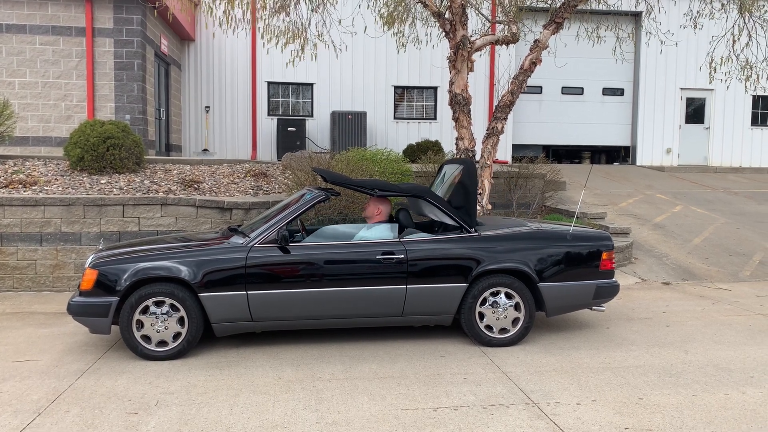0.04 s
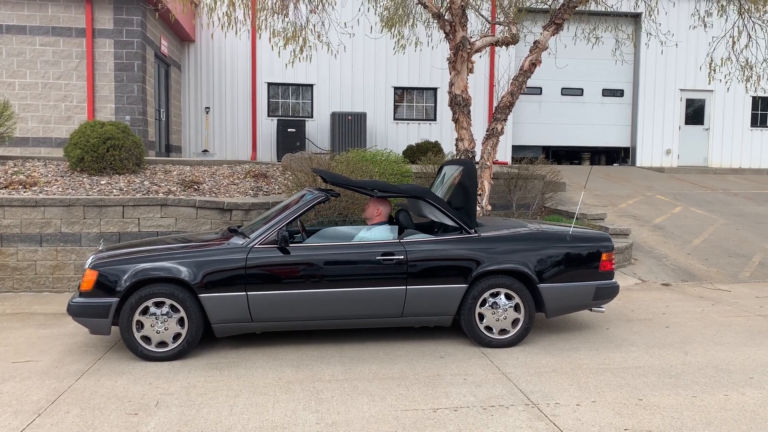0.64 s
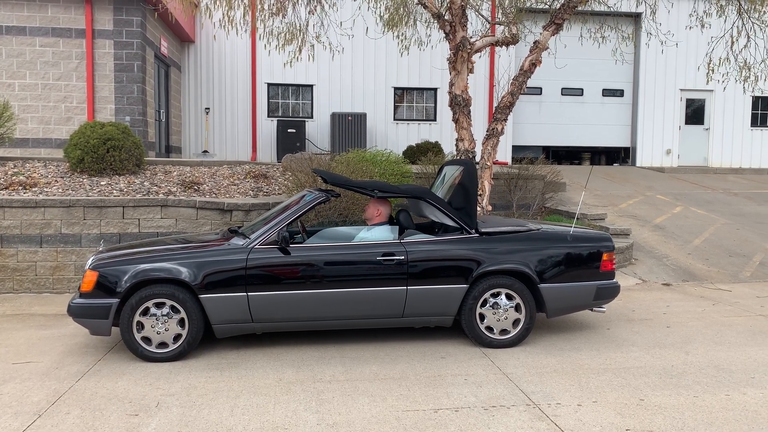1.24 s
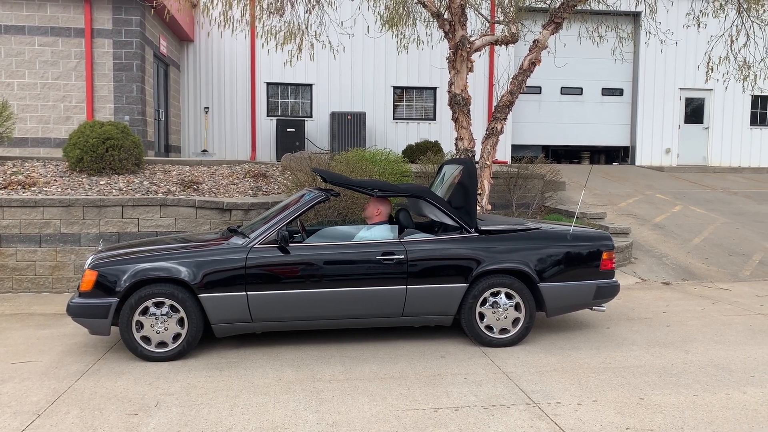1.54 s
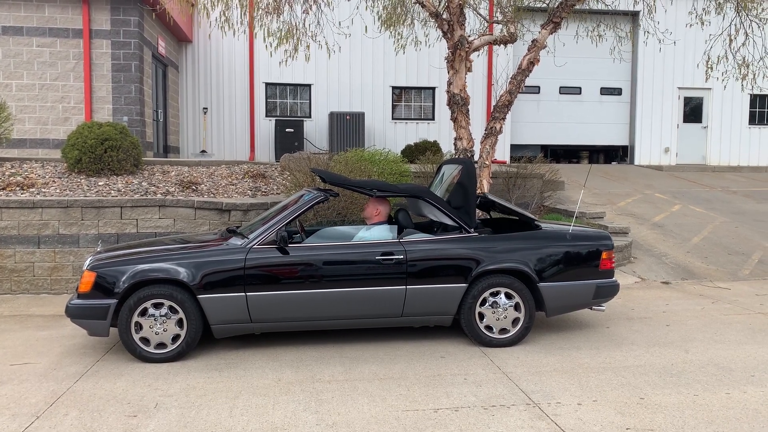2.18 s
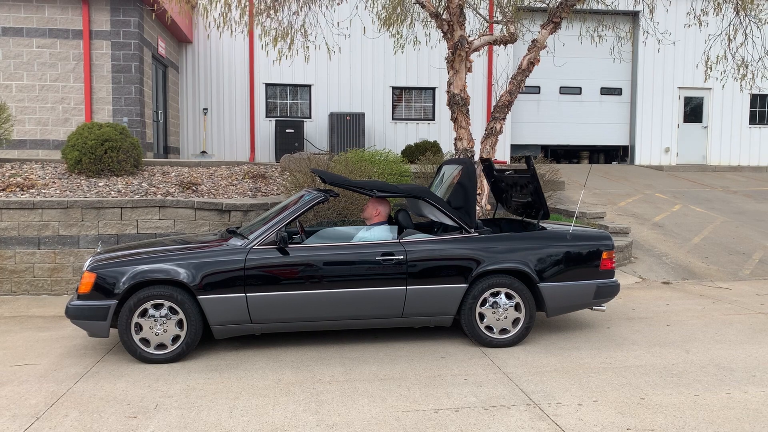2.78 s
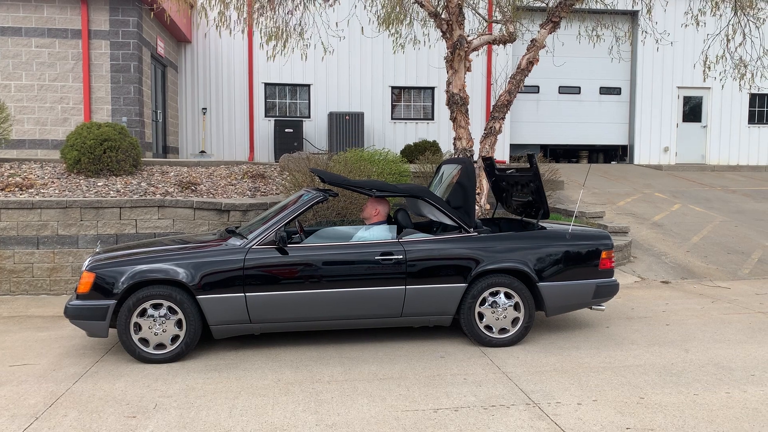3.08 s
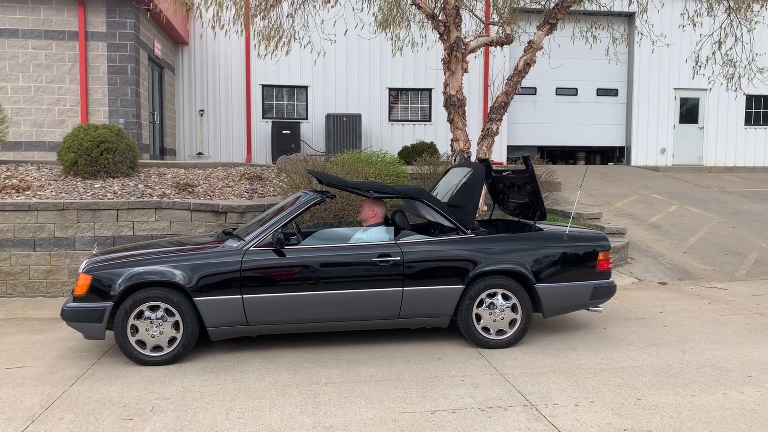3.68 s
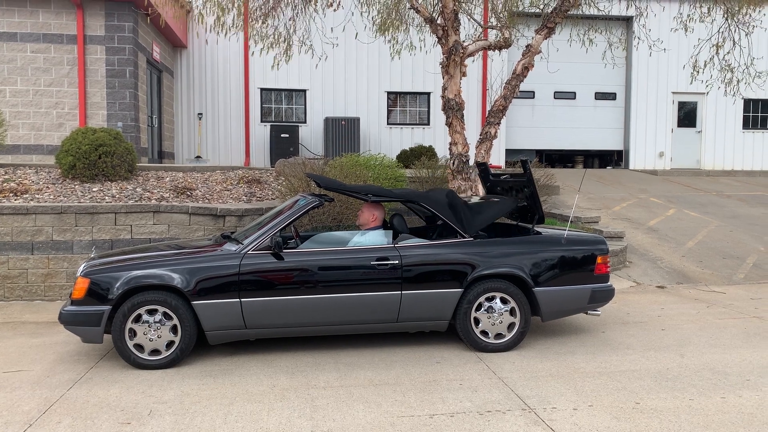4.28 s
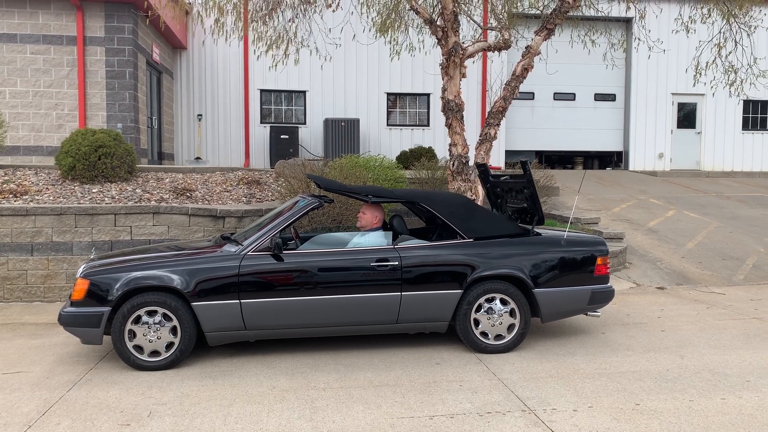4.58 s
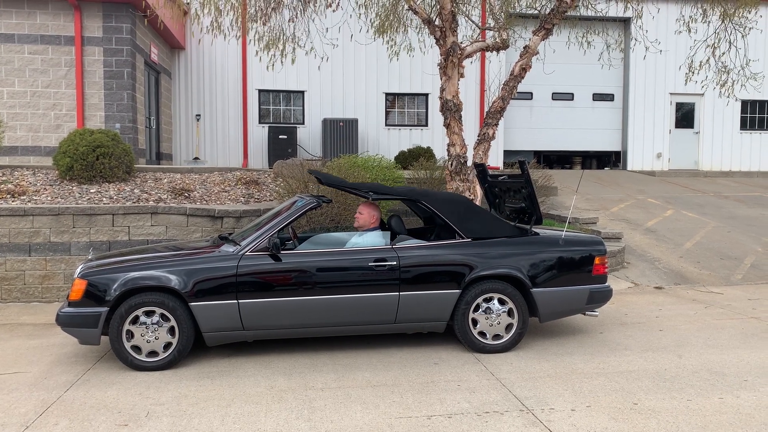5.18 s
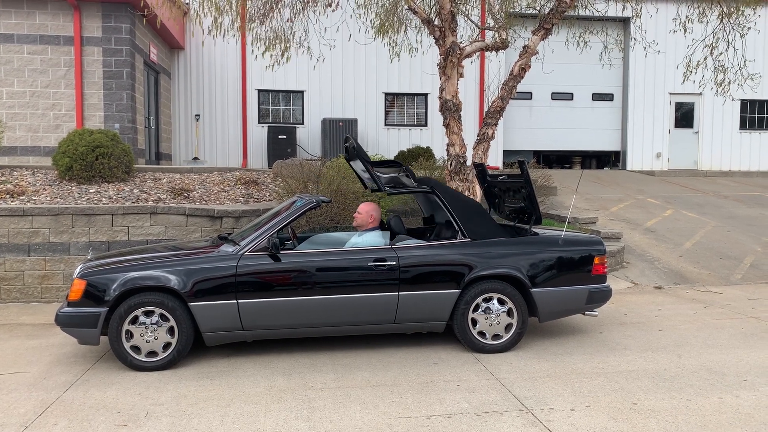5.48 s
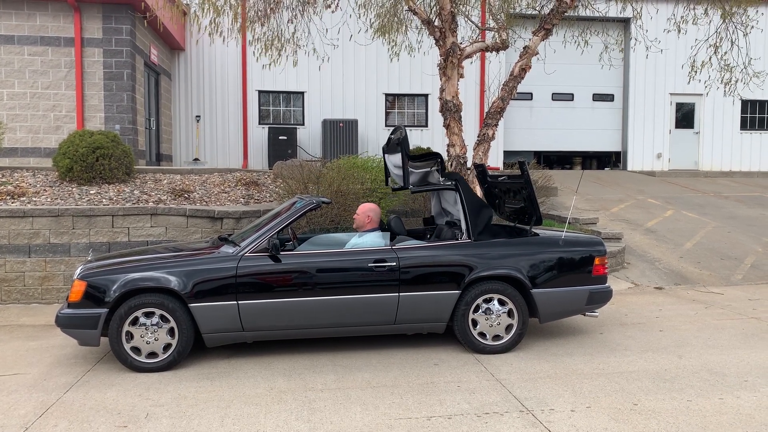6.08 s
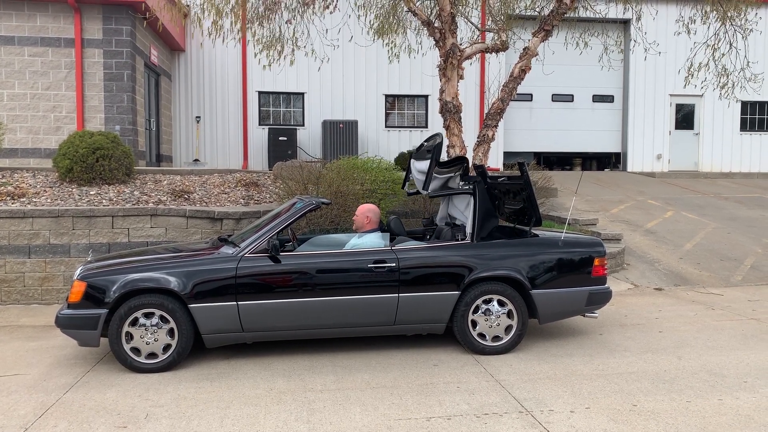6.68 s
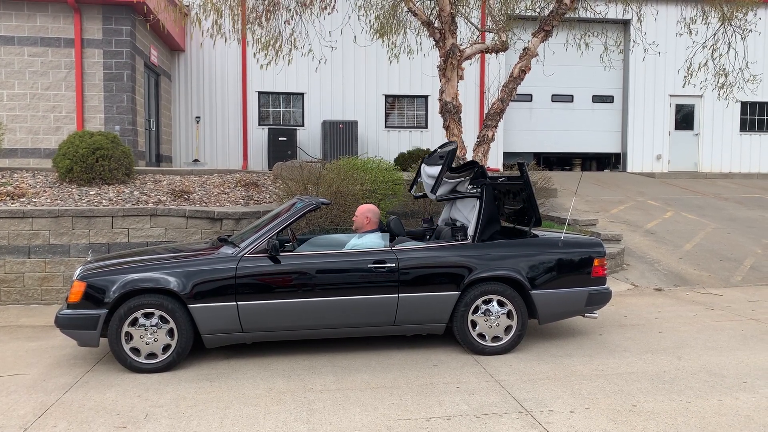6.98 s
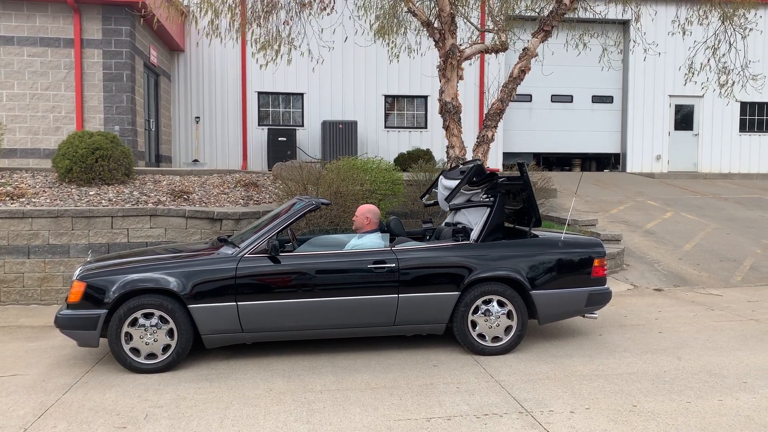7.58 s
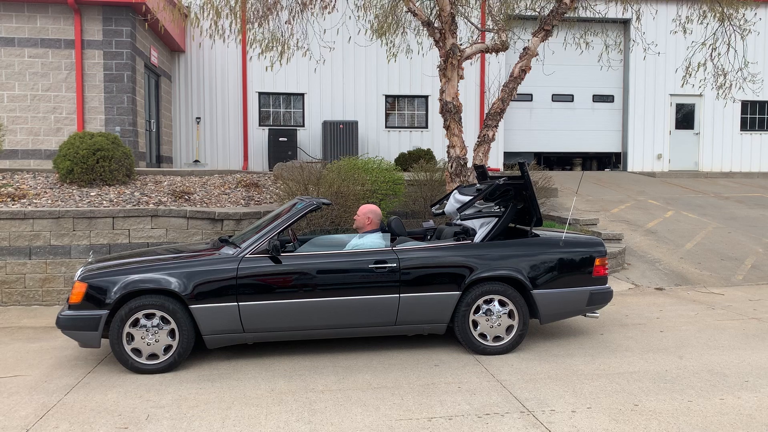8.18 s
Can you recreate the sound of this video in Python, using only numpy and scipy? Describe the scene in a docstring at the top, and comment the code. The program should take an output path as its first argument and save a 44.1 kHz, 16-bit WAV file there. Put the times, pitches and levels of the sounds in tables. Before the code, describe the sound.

A convertible folds its roof on a breezy day outdoors. First the pump whines and whirrs for about three seconds, ending in a quick cluster of metal clicks and a short low drone. Two lighter hums, faint linkage ticks and soft sliding cloth follow. Gusts rumble and bump against the microphone throughout, over a dull wash of far traffic and leaves.

```python
"""Wind rumbles and thumps on the microphone, and through it a hydraulic pump whines: a convertible is
folding its roof in a breezy yard. The pump runs while the cover lifts, steel catches click as it locks
upright, and a low drone swells briefly. Later the pump hums on lighter strokes and the linkage ticks.
Far traffic and rustling trees lie to the left of the stereo microphone; cloth, seals, catches and a
faint steady high hiss sound from the back of the car, on the right."""
import sys
import numpy as np
from scipy.fft import rfft, irfft, next_fast_len
from scipy.io import wavfile
from scipy.ndimage import uniform_filter1d, map_coordinates

SR = 44100
rng = np.random.default_rng(int(sys.argv[2]) if len(sys.argv) > 2 else 0)


def output_pcm(signal):
    """Save a mono or channel-first signal as 16-bit PCM at the path in sys.argv[1].

    Samples are clipped to [-1, 1] before scaling.
    """
    pcm = np.clip(np.atleast_2d(signal).T, -1, 1) * 32767
    wavfile.write(sys.argv[1], SR, np.round(pcm).astype(np.int16))


N = 367794

# the surroundings swell and ebb: t/s, traffic level/dB, leaves level/dB
YARD_LEVELS = [(0.0, -36, -41), (0.8, -36, -43), (2.4, -35, -41.5), (2.9, -36, -42), (3.25, -38.5, -44),
               (3.6, -36.5, -44), (4.05, -38.5, -45), (4.6, -38.5, -43), (4.95, -36, -43),
               (5.15, -34.5, -41), (5.42, -36, -40.5), (5.6, -37.5, -43), (6.15, -38.5, -45.5),
               (6.5, -40.5, -48), (6.78, -39.5, -47), (7.12, -36, -46), (7.34, -35, -43), (7.68, -40, -46),
               (8.34, -36, -48)]
# traffic heard from far off: f/Hz, level/dB
TRAFFIC_SPECTRUM = [(150, -25), (350, -3), (500, -1), (650, 1), (790, 3.5), (930, 0.5), (1100, -2),
                    (1500, -9.5), (2000, -28), (3000, -40), (5000, -80)]
# how alike the traffic is in both channels: f/Hz, likeness
TRAFFIC_LIKENESS = [(300, .6), (750, 0.55), (1100, 0.76), (1700, 0.38)]
# the traffic leans left: f/Hz, left over right/dB
TRAFFIC_BALANCE = [(350, -2), (550, 2.5), (740, 5), (880, 4.5), (1050, 1.5)]
# leaves in the trees: f/Hz, level/dB
LEAVES_SPECTRUM = [(700, -14.5), (1300, 3.5), (1800, 4), (2300, 0.5), (2800, -2), (3300, -7), (4000, -11),
                   (5000, -16.5), (6300, -24), (8400, -56.5), (9300, -27.5), (15000, -71.5)]
# their rustle arrives diffusely: f/Hz, left-right likeness
LEAVES_LIKENESS = [(300, 0.44), (1100, 0.55), (1700, 0.31), (3000, 0.39), (5000, 0.24), (8400, 0.13),
                   (12000, 0.083)]
# a faint steady high hiss from the back of the car, on the right: f/Hz, level/dB
REAR_HISS_SPECTRUM = [(3000, 1.5), (6500, -3.5), (8300, 7.5), (9300, -4.5), (11000, -10), (14000, -8.5),
                      (15500, -16.5)]

# the breeze right at the microphone: t/s, rumble level/dB, flutter level/dB
WIND_LEVELS = [(0.0, -26, -34), (0.09, -26, -33), (0.3, -30, -36), (0.7, -29, -37), (1.08, -24.5, -29.5),
               (1.37, -30, -37), (1.9, -29.5, -36), (2.3, -30, -32), (2.65, -24.5, -33), (2.78, -28, -32.5),
               (2.97, -20, -27.5), (3.2, -26, -33.5), (3.37, -22, -36), (3.62, -27.5, -34),
               (3.72, -24, -28.5), (3.9, -27.5, -35), (4.2, -30.5, -44), (4.55, -34.5, -37.5),
               (4.83, -27.5, -33.5), (4.87, -42, -46), (5.08, -34.5, -37), (5.42, -28.5, -41),
               (5.7, -32, -38), (6.25, -34.5, -43), (6.5, -41, -41), (6.9, -36, -41), (7.2, -32, -36.5),
               (7.36, -25, -32.5), (7.58, -30, -33.5), (7.72, -27, -32.5), (7.82, -30, -44.5),
               (8.15, -39.5, -43), (8.34, -37, -44)]
# its deep rumble: f/Hz, level/dB
RUMBLE_SPECTRUM = [(12, -44.5), (20, -25.5), (45, -3.5), (70, 3.5), (100, -2), (180, -14), (230, -37),
                   (400, -120)]
# its higher flutter: f/Hz, level/dB
FLUTTER_SPECTRUM = [(70, -29.5), (130, -3), (170, -0.5), (250, -5), (340, -10.5), (500, -24), (900, -43),
                    (2000, -90)]
# the strongest eddies to hit the microphone: t/s, level/dB, bottom f/Hz, top f/Hz, half-length/s
EDDY_HITS = [(0.313, -20.5, 111, 336, 0.016), (0.427, -20.5, 99, 280, 0.011), (1.05, -20, 70, 220, 0.0061),
             (1.093, -14.5, 55, 130, 0.0076), (1.197, -26, 45, 130, .012), (2.085, -21, 65, 130, 0.008),
             (2.205, -19.5, 65, 150, 0.0062), (2.535, -23, 100, 278, 0.012),
             (2.849, -14.5, 42, 154.7, 0.023), (2.996, -13, 75, 358, 0.0074), (3.059, -18, 65, 101, 0.0093),
             (3.691, -20.5, 200, 600, 0.0022), (3.698, -9.5, 58, 210, 0.0071),
             (3.714, -18.5, 110, 428, 0.0066), (3.735, -15, 80, 370, 0.0055), (3.762, -14, 58, 125, 0.0092),
             (3.775, -22, 150, 420, 0.0057), (3.864, -21, 130, 380, 0.0031), (3.888, -19, 130, 430, 0.0053),
             (3.948, -22, 100, 298, 0.0026), (4.389, -22.5, 90, 160, 0.0096),
             (4.823, -25, 100, 240, 0.0025), (4.844, -17, 75, 109, 0.0071), (5.225, -13.5, 95, 205, 0.0037),
             (5.283, -23, 80, 190, 0.0055), (5.392, -15.5, 75, 165, 0.008), (5.416, -17, 140, 290, 0.0061),
             (5.511, -28, 150, 320, .003), (5.531, -17.5, 42, 150, 0.0089), (6.031, -23, 55, 140, 0.0068),
             (6.138, -22.5, 70, 160, 0.0038), (6.233, -21.5, 70, 130, 0.0087),
             (6.278, -22.5, 101, 196, 0.0059), (6.677, -24.5, 65, 117, 0.013),
             (6.889, -23, 55, 110, 0.0079), (7.326, -20, 70, 200, 0.0037), (7.379, -12.5, 80, 260, 0.0029),
             (7.448, -25, 130, 480, 0.0061), (7.468, -17, 65, 230, 0.0064), (7.483, -19, 120, 420, 0.0059),
             (7.501, -18.5, 100, 340, 0.0047), (7.525, -19, 70, 180, .004), (7.634, -13, 42, 110, 0.013),
             (7.654, -24, 250, 600, .0015), (7.664, -18, 90, 300, 0.0058), (7.722, -26, 70, 260, 0.0078)]

# sound from the back of the car arrives almost directly: f/Hz, left-right likeness
REAR_LIKENESS = [(3000, 0.42), (9000, 0.84)]
# cloth and seals sliding: t/s, level/dB, centre f/Hz, half-length/s
CLOTH_SWISHES = [(1.804, -58, 8900, 0.009), (1.845, -67.5, 9400, 0.028), (2.32, -56.5, 4050, 0.19),
                 (5.25, -55, 4000, 0.077), (7.45, -66, 3900, 0.28)]
# the colour of one swish: multiple of its centre, level/dB
SWISH_SPECTRUM = [(.25, -43), (.5, -17), (.86, -6), (0.999, 8), (1.15, -5), (1.35, -25), (2, -41), (4, -60)]
# catches and joints making contact: t/s, relative tick level/dB, relative clack level/dB
CONTACTS = [(1.802, -43, -65), (2.795, -35, -22), (2.8, -44, -28), (2.821, -43, -38), (2.834, -41, -48),
            (2.868, -24, -40), (2.875, -35, -55), (2.881, -25, -48), (2.915, -41, -65), (3.353, -42.5, -68),
            (5.117, -36, -65)]
# the bright tick of steel: f/Hz, level/dB
TICK_SPECTRUM = [(3000, -42), (6000, -6), (7500, 0), (9300, 1.5), (10300, -4), (12000, -16), (14000, 0.5),
                 (15500, -3)]
# the clack of a catch's body: f/Hz, level/dB
CLACK_SPECTRUM = [(600, -16), (1500, 8), (2200, 5), (3000, 6), (4300, -1), (6000, -13), (10000, -12),
                  (12000, -27), (15000, -35)]
# the latch's ringing modes: f/Hz, relative level/dB, t60/s
LATCH_MODES = [(1976, 4, .16), (3020, 3, 0.12), (3838, -2, .08), (4230, -2, .045), (5310, 2, 0.06),
               (8100, -9, .05), (8930, -8, .05)]

# the pump on lighter strokes: start t/s, end t/s, upper f/Hz, level/dB, lower f/Hz, level/dB
LIGHT_STROKES = [(3.143, 3.52, 444, -41, 416.4, -40), (6.865, 7.3, 456, -44, 400, -48)]
# the lines of the pump's whine: multiple of its pitch, relative level/dB, roughness 0-1
WHINE_LINES = [(1, 3.4, 0.14), (1.047, -0.5, 0.3), (1.4, -2.5, 0.1), (.765, -4, 0.4), (5.13, -29, .6)]
# the motor's whirr: f/Hz, level/dB
WHIRR_SPECTRUM = [(150, -11), (280, -9), (350, -1), (440, -0.5), (476, -6.5), (515, 1), (555, 3),
                  (610, -14), (740, -15), (1000, -30), (2500, -81.5)]
# oil hissing through the valve: f/Hz, level/dB
VALVE_SPECTRUM = [(4000, -13), (6000, 7), (7700, 6.5), (8450, 6), (9000, -0.5), (10500, -8), (14000, -39)]
# oil rushing in the pipes: f/Hz, level/dB
PIPES_SPECTRUM = [(1800, -29), (2300, -7.5), (2500, 2.5), (2800, -13), (3080, 8), (3300, -17), (3700, -38)]

YARD_LEAD_S, REAR_LEAD_S = .00046, -.00022  # left port's lead: trees and road left, car's rear right
COVER_UP_S, RUN_DOWN_S = 2.85, 0.17  # the cover stands upright, and the pump runs down


def amp(db):
    """Decibels to gain."""
    return 10 ** (np.asarray(db) / 20)


def unit(x):
    """Scaled to rms 1."""
    return x / np.sqrt(np.mean(x ** 2) + 1e-20)


def along(points, hz):
    """(f/Hz, value) points read on a log axis."""
    freqs, values = np.transpose(points)
    return np.interp(np.log(hz + 1), np.log(freqs), values)


def curves(rows):
    """One value per sample for each column after the time."""
    times, *columns = np.transpose(rows)
    return [np.interp(np.arange(N) / SR, times, column) for column in columns]


def wobble(rate):
    """A smooth random curve, rate knots a second."""
    knots = rng.standard_normal(int(N * rate / SR) + 4)
    return map_coordinates(knots, [np.arange(N) * rate / SR])


def bell(s, half_length):
    """A smooth rise and fall around time s."""
    return np.exp(-.5 * ((np.arange(N) / SR - s) / half_length) ** 2)


def arch(start, end):
    """Quick rise, rounded hold and quick release between two times."""
    progress = np.clip((np.arange(N) / SR - start) / (end - start), 0, 1)
    return np.sqrt(np.abs(np.sin(np.pi * progress)))


def filtered(x, response):
    """x shaped by a frequency response."""
    n = x.shape[-1]
    padded = next_fast_len(n + 8192)
    return irfft(rfft(x, padded) * response(np.fft.rfftfreq(padded, 1 / SR)), padded)[..., :n]


def rush(spectrum, likeness, size=N):
    """Stereo noise of rms 1 with a given colour and left-right likeness."""
    def shape(hz):
        width = np.arccos(np.clip(along(likeness, hz), -1, 1)) / 2
        return amp(along(spectrum, hz)) * [np.cos(width), np.sin(width)]
    mid, side = filtered(rng.standard_normal((2, size)), shape)
    return unit(np.array([mid + side, mid - side]))


def even(x, window_s=.045):
    """Stereo noise with its slow chance swells levelled out."""
    power = uniform_filter1d(np.mean(x ** 2, axis=0), round(window_s * SR))
    power = uniform_filter1d(power, round(window_s * SR / 2))
    return unit(x / np.sqrt(np.abs(power) + 1e-9))


def tone(hz, rough, flutter_rate):
    """A line on a pitch curve; roughness (0-1) smears it into a narrow band."""
    phase = 2 * np.pi * np.cumsum(hz * np.ones(N)) / SR
    smear = wobble(flutter_rate) * np.sin(phase) + wobble(flutter_rate) * np.cos(phase)
    return np.sqrt(2 * (1 - rough)) * np.sin(phase) + np.sqrt(rough) * smear


def add(track, s, sound):
    """Mix a stereo sound in at time s."""
    start = max(round(s * SR), 0)
    part = track[:, start:start + sound.shape[1]]
    part += sound[:, :part.shape[1]]


def placed(x, lead_s, tilt_db):
    """Direction: how much earlier and louder the microphone's left port hears it."""
    sides = np.array([[.5], [-.5]])
    return amp(tilt_db * sides) * filtered(x, lambda hz: np.exp(2j * np.pi * hz * lead_s * sides))


def rear_hiss():
    """A faint steady high hiss from the back of the car, on the right."""
    return placed(amp(-68) * rush(REAR_HISS_SPECTRUM, REAR_LIKENESS), REAR_LEAD_S, tilt_db=0.5)


def yard():
    """Far traffic roars dully on the left; leaves rustle above it."""
    traffic_db, leaves_db = curves(YARD_LEVELS)
    traffic = amp(traffic_db + 0.4 * wobble(7.9)) * rush(TRAFFIC_SPECTRUM, TRAFFIC_LIKENESS)
    traffic = filtered(traffic, lambda hz: amp(along(TRAFFIC_BALANCE, hz) * np.array([[.5], [-.5]])))
    leaves = amp(leaves_db + 0.64 * wobble(13)) * rush(LEAVES_SPECTRUM, LEAVES_LIKENESS)
    return placed(traffic, YARD_LEAD_S, tilt_db=0.0) + placed(leaves, YARD_LEAD_S, tilt_db=-0.1)


def wind():
    """Turbulence right at the microphone's ports: a deep rumble and a higher flutter, lumpy together."""
    rumble_db, flutter_db = curves(WIND_LEVELS)
    lumps, sway = wobble(rate=28), wobble(rate=11)
    rumble = amp(rumble_db + .9 * lumps + 1.1 * sway) * even(rush(RUMBLE_SPECTRUM, [(60, 0.9)]))
    flutter = amp(flutter_db + 1.6 * lumps) * even(rush(FLUTTER_SPECTRUM, [(200, 0.81)]))
    return rumble + flutter


def eddies():
    """Each eddy thumps the microphone softly; larger ones reach deeper, faster ones higher."""
    out, t = np.zeros((2, N)), np.arange(-SR // 10, SR // 10) / SR
    for s, db, bottom_hz, top_hz, half_length in EDDY_HITS:
        colour = sorted([(.48 * bottom_hz, -30), (bottom_hz, 0), ((bottom_hz + top_hz) / 2, -2),
                         (top_hz, -7), (2 * top_hz, -21), (10 * top_hz, -90), (20 * top_hz, -125)])
        swell = np.exp(-.5 * (t / half_length) ** 2)
        puff = rush(colour, likeness=[(100, 0.9)], size=len(t)) * swell
        add(out, s + t[0], amp(db) * puff * np.linalg.norm(swell) / np.linalg.norm(puff))
    return out


def drone():
    """A rough low drone swells briefly, dead centre, as the cover comes upright."""
    pitch_hz = 86.8 + 3 * wobble(9.6)
    return amp(-27) * arch(start=2.8, end=3.57) * tone(pitch_hz, rough=0.15, flutter_rate=9.8)


def roof_cloth():
    """Right of the microphone, cloth and rubber seals slide and swish as the roof folds."""
    out = np.zeros((2, N))
    for s, db, centre_hz, half_length in CLOTH_SWISHES:
        colour = [(multiple * centre_hz, level) for multiple, level in SWISH_SPECTRUM]
        out += amp(db) * bell(s, half_length) * rush(colour, REAR_LIKENESS)
    return placed(out, REAR_LEAD_S, tilt_db=-0.5)


def catches():
    """Steel meets steel at the back of the car: a tick, a dry clack and a faint ring from the latch."""
    tick_t60_s, clack_t60_s, walls_t60_s = .013, 0.054, 0.21
    walls_db, ring_db = -20, -15
    out, t = np.zeros((2, N)), np.arange(SR // 4) / SR
    attack = 1 - np.exp(-t / .0003)
    # the tick dies at once; the yard's walls answer weakly
    tick_decay = amp(-60 * t / tick_t60_s) + amp(walls_db - 60 * t / walls_t60_s)
    for s, tick_db, clack_db in CONTACTS:
        tick = rush(TICK_SPECTRUM, REAR_LIKENESS, size=len(t)) * tick_decay
        top_hz = 25000 + 335 * tick_db  # softer ticks are duller
        tick = filtered(tick, lambda hz: 1 / (1 + (hz / top_hz) ** 10))
        clack = rush(CLACK_SPECTRUM, REAR_LIKENESS, size=len(t)) * amp(-60 * t / clack_t60_s)
        ring = sum(amp(db + ring_db - 60 * t / t60) * np.sin(2 * np.pi * (hz * t + rng.random()))
                   for hz, db, t60 in LATCH_MODES)
        add(out, s, amp(-9.0) * attack * (amp(tick_db) * tick + amp(clack_db) * (clack + ring)))
    return placed(out, REAR_LEAD_S, tilt_db=1.5)


def pump_strokes():
    """On lighter strokes the pump, left of centre, hums on two lower lines that drift together."""
    out = np.zeros(N)
    for start, end, upper_hz, upper_db, lower_hz, lower_db in LIGHT_STROKES:
        speed = 1 + 0.0031 * wobble(4.2)
        for hz, db in (upper_hz, upper_db), (lower_hz, lower_db):
            out += amp(db) * arch(start, end) * tone(hz * speed, rough=.4, flutter_rate=20)
    return placed(out, lead_s=0.00044, tilt_db=1.2)


def pump():
    """The pump lifts the cover: its motor whines and whirrs left of centre, oil hisses on the right."""
    t = np.arange(N) / SR
    running = np.clip(1 - (t - COVER_UP_S) / RUN_DOWN_S, 0, 1)
    loaded_hz = 523
    unloaded_hz = 16.98 * np.exp(-t / 0.252)  # the pitch sags as the pump takes the load
    eased_hz = 8.53 * bell(COVER_UP_S, 0.311)  # and rises again as the cover nears the top
    whine_hz = loaded_hz + unloaded_hz + eased_hz
    whine = sum(amp(db) * tone(multiple * whine_hz, rough, flutter_rate=14)
                for multiple, db, rough in WHINE_LINES)
    whirr = rush(WHIRR_SPECTRUM, likeness=[(400, 0.87)])
    motor = amp(-41.5) * whine + amp(-32) * whirr
    valve = amp(-65) * rush(VALVE_SPECTRUM, REAR_LIKENESS)
    pipes = amp(-59.5) * rush(PIPES_SPECTRUM, REAR_LIKENESS)
    return (placed(running * motor, lead_s=0.00053, tilt_db=1.2)
            + placed(running * (valve + pipes), REAR_LEAD_S, tilt_db=0.5))


def scene():
    """The yard and the car as they reach the microphone's two ports."""
    background = wind() + eddies() + drone() + yard() + rear_hiss()
    return background + pump() + pump_strokes() + roof_cloth() + catches()


def record(dry):
    """The recorder cuts the deepest bass and everything above its band limit."""
    low_cut_hz, top_hz = 24, 15400
    return filtered(dry, lambda hz: hz ** 4 / (hz ** 4 + low_cut_hz ** 4) * (hz < top_hz))


dry = scene()
out = record(dry)
output_pcm(out)
```